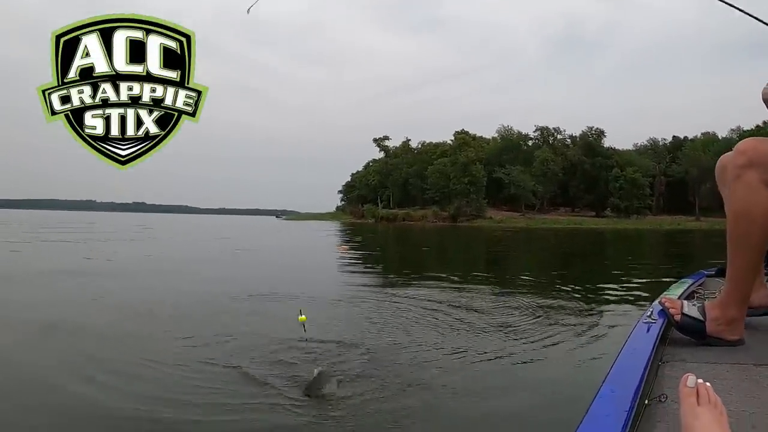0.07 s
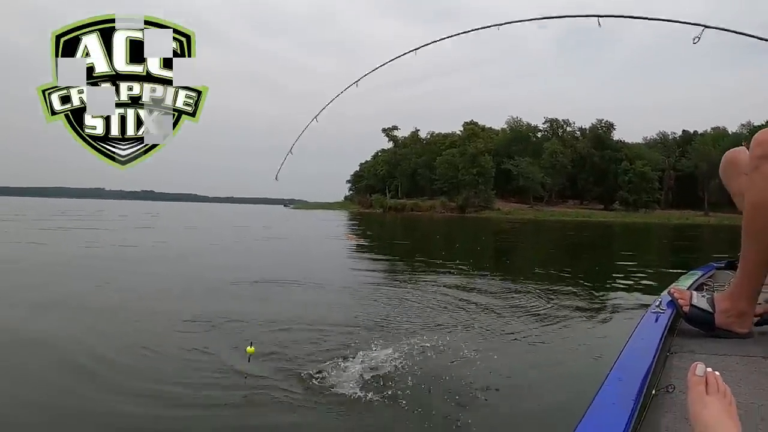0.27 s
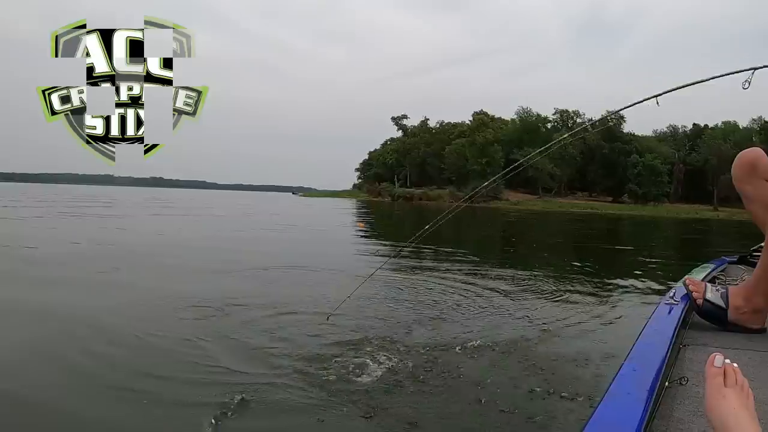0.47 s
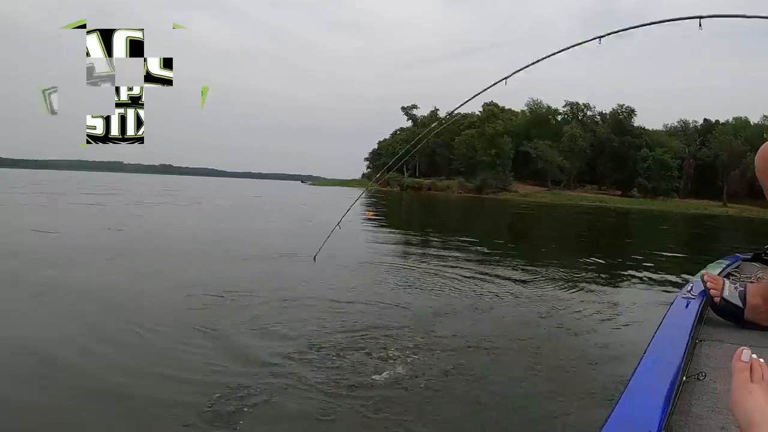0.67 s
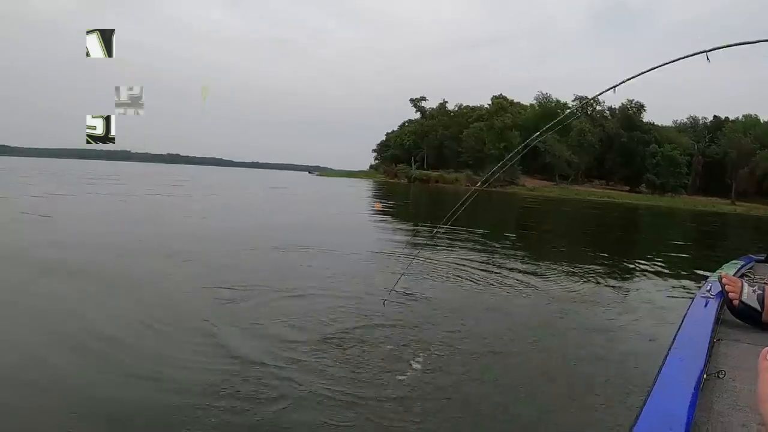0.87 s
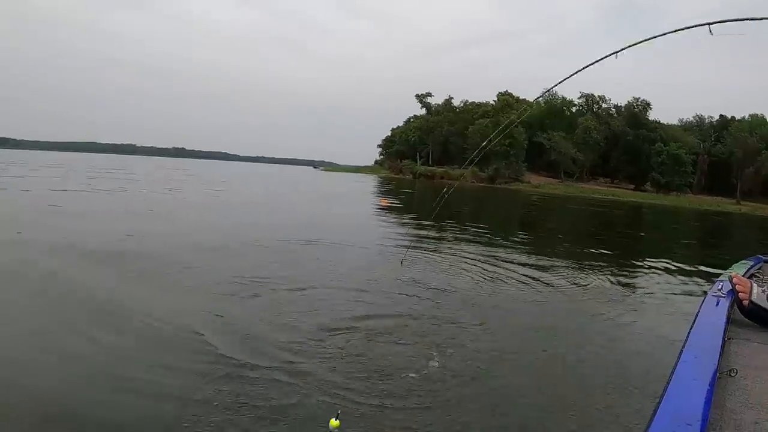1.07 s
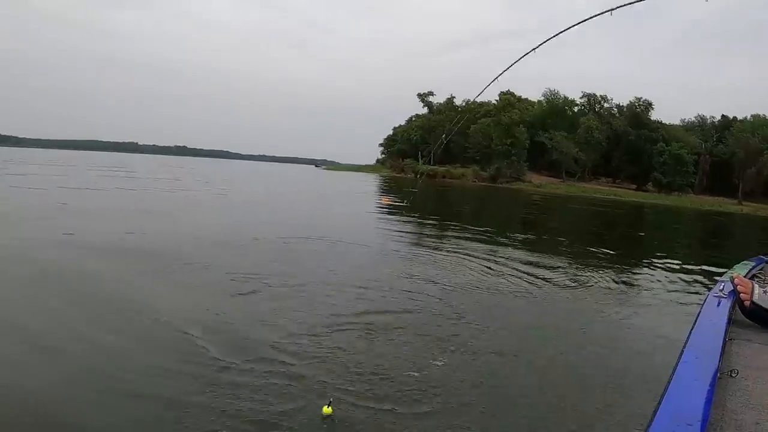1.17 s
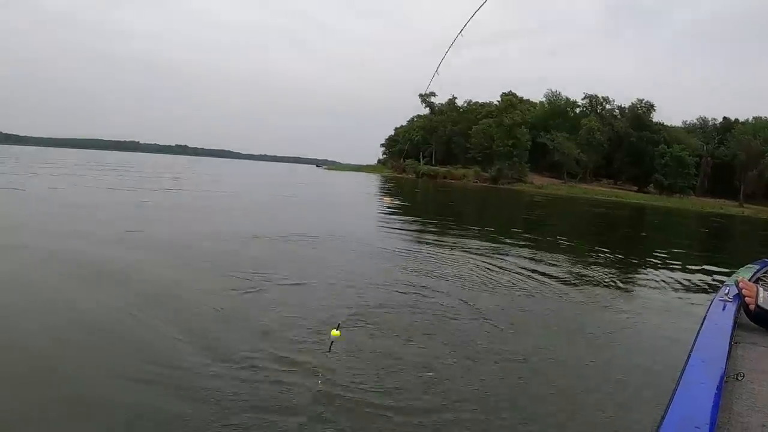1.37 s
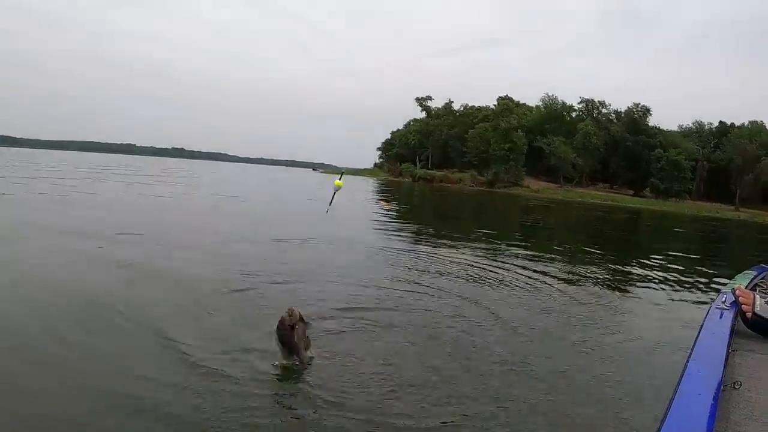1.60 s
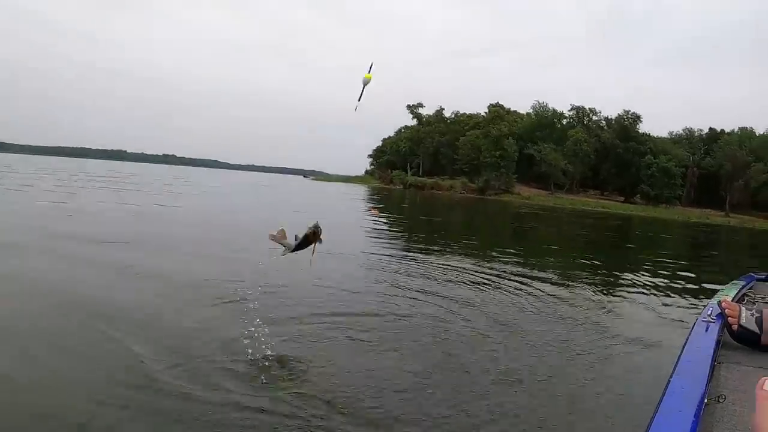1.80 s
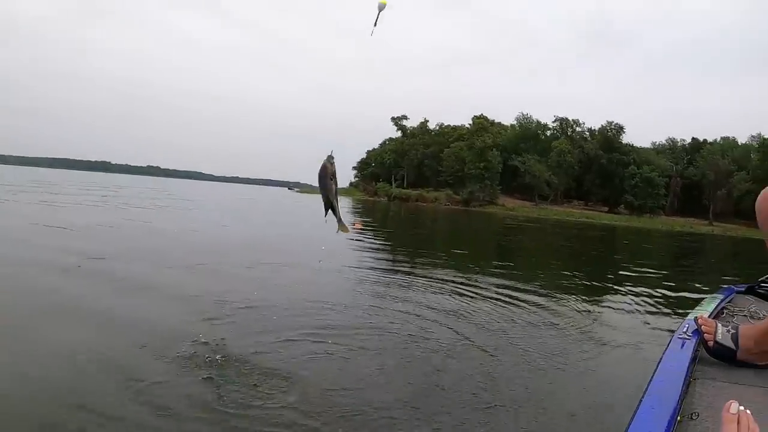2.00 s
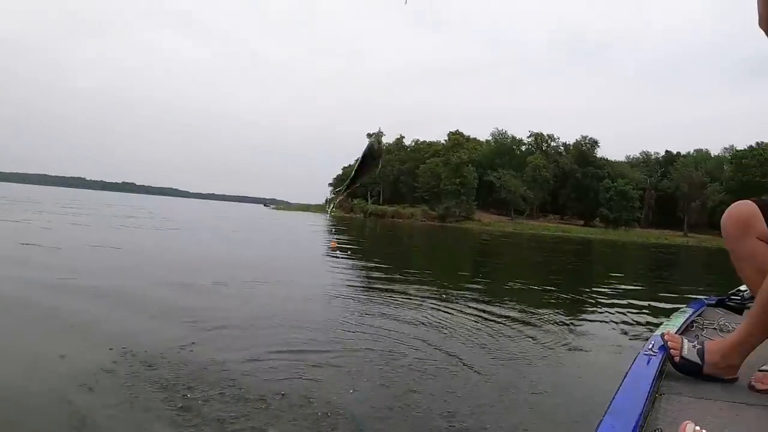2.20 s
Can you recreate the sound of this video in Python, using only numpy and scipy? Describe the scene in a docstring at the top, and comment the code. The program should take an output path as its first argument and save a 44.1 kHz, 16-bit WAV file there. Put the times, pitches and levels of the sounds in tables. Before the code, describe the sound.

After near silence, a fish slaps and churns the water in two quick bursts, gurgling and squeaking wetly; sparse bubbles and a sharp droplet click follow, then fine run-off drips, in open air, close to the microphones.

```python
"""A faint open-air hush, a thin whistle of taut line and light wind rumble come first, on a close pair of mics.
Then a hooked fish thrashes at the surface of a calm lake beside a boat and is lifted out dripping.
Slaps are shaped noise bursts, big bubbles are dying sines that mostly rise, churned water and spray are
ringing grains over hiss; wet squeaks and gulps are gliding tones, and a lone drop falls between.
The run-off is a shower of tiny rising chirps; hush, ripples and wind are filtered noise."""
import sys
import numpy as np
from scipy import signal
from scipy.fft import rfft, irfft
from scipy.io import wavfile

SR = 44100
rng = np.random.default_rng(int(sys.argv[2]) if len(sys.argv) > 2 else 0)


def volts(x):
    """Linear amplitude factor 10**(x/20) for a level x in dB, scalar or array-like."""
    e = np.asarray(x, float) / 20
    return 10 ** e


def materialize(psi):
    """Save the field psi as 16-bit PCM at rate SR to the path in sys.argv[1].

    A 1-D psi becomes a single channel; in a 2-D psi each row is a channel.
    """
    bounded = np.clip(np.atleast_2d(psi).T, -1, 1)
    quanta = np.round(bounded * 32767).astype(np.int16)
    wavfile.write(sys.argv[1], SR, quanta)


N = 99225  # samples, 2.25 s

# open-air hush, spectrum shape: [f/Hz, relative level/dB]
AIR_SPECTRUM = [(100, -6), (166, 7), (519, -6), (1340, -12.5), (1490, -33), (2220, -73), (3250, -41.5),
                (9340, -18), (15500, -58)]
AIR_DB = -75  # mid level above 300 Hz, before its slow drift
# ripples lapping the hull
LAP_HZ, LAP_WIDTH_HZ, LAP_DB = 172.9, 100, -72

# wind rumble: [t/s, level/dB]
WIND_LEVEL = [(0, -83), (.2, -63), (.3, -81), (.8, -74), (.87, -51.5), (.95, -58), (1.32, -66), (1.48, -62),
              (1.75, -69), (2.09, -69.5), (2.25, -64)]
WIND_CUT_HZ, WIND_LUMPS_DB = 52, 6
WIND_RIGHT_DB, WIND_RIGHT_OWN = -9, 1.1  # right gain; share of rumble heard on the right alone

# taut line hissing through the water, one curve each: [t/s, f/Hz, level/dB]
LINE_CURVES = [
    [(0, 3130, -69), (.15, 3110, -76.5), (.175, 2900, -62), (.222, 3030, -58)],
    [(1.725, 2925, -73), (1.76, 2640, -72), (1.81, 2590, -69)],
]
LINE_BLUR_HZ = 130

# gulps, air pockets that shrink and climb, one curve each: [t/s, f/Hz, level/dB]
GULP_CURVES = [
    [(.518, 350, -42), (.595, 410, -52), (.625, 680, -45)],
    [(.652, 290, -51), (.695, 400, -52), (.71, 540, -49)],
    [(.724, 450, -51), (.77, 535, -52), (.798, 780, -48)],
]
# wet squeaks, air forced through a closing gap: [t/s, f/Hz, level/dB]
LONG_SQUEAK = [(.774, 1993, -54), (.79, 3200, -45), (.8, 3840, -34), (.818, 5470, -53), (.835, 5480, -55.5),
               (.846, 5900, -61)]
SHORT_SQUEAK_CURVE = [(0.767, 3340, -47), (.773, 3560, -43), (0.784, 5420, -56), (0.788, 6170, -55)]
OVERTONE_DB = -23.5  # octave, against the tone

# run-off from the lifted fish
DRIPS_FROM_S, DRIPS_TO_S, DRIP_COUNT = 1.72, 2.24, 230
DRIP_LOW_HZ, DRIP_HIGH_HZ = 1500, 8000  # range of starting pitches
DRIP_DB, DRIP_CYCLES = 5, 40  # base level over the spray; starting-pitch cycles to fall 60 dB

# churned water: [t/s, small-bubble level/dB, spray level/dB]
CHURN_LEVELS = [(0, -68.5, -70), (.23, -63.5, -66.5), (.25, -37.5, -42.5), (.265, -42, -32.5),
                (.285, -44.5, -37.5), (.3, -23, -44), (.325, -25.5, -33.5), (.345, -33.5, -45.5),
                (.4, -37, -52.5), (.45, -41, -45.5), (.51, -38, -39), (.65, -46.5, -49),
                (.675, -58.5, -62.5), (.73, -52.5, -59), (.83, -63.5, -55.5), (.88, -69, -66),
                (1.01, -62, -66), (1.18, -69, -68.5), (1.4, -73, -71.5), (1.71, -79.5, -84),
                (1.75, -71.5, -78), (1.92, -66, -61.5), (2.08, -80.5, -72), (2.25, -73.5, -76.5)]
# small bubbles, spectrum shape: [f/Hz, relative level/dB]
FOAM_SPECTRUM = [(150, -46), (250, -11.5), (411, -15), (524, -3.5), (738, -4), (1030, 0.5), (2000, -2.5),
                 (3600, -32.5)]
# airborne droplets, spectrum shape: [f/Hz, relative level/dB]
SPRAY_SPECTRUM = [(1060, -48.5), (1800, -14), (3300, -13.5), (4720, -21.5), (9790, -27.5), (11300, -41.5),
                  (12400, -47), (15500, -63)]
FOAM_PER_S, SPRAY_PER_S = 3500, 3500  # grains per second before clumping
FOAM_CYCLES, SPRAY_CYCLES = 4.0, 3.5  # ring: pitch over bandwidth of each resonance
GRAIN_SPREAD_DB, CLUMP_DB = 2.5, 3.0
FOAM_WIDE_DB, SPRAY_WIDE_DB = -12, 0  # stereo width; each side takes half

# large bubbles: [t/s, starting f/Hz, starting level/dB, t60/s, initial rise/(octaves/s)]
BIG_BUBBLES = [(.255, 183, -25, 0.023, 14), (.274, 2146, -18.5, 0.023, 48), (.294, 763, -9, 0.036, 1.5),
               (.314, 1290, -13.5, 0.058, 7.5), (.305, 781, -24, 0.186, 3.5), (.339, 533, -17.5, 0.055, -1),
               (.358, 606, -25.5, 0.1, 9), (.36, 1338, -19.5, 0.062, 16.5), (.359, 1625, -25.5, 0.066, 5),
               (.41, 641, -21.5, 0.077, 6.5), (.425, 297.6, -36, 0.67, 26), (.628, 743, -24, 0.039, 7),
               (.628, 1670, -17.5, 0.014, 12), (.768, 1490, -45.5, 0.049, 8), (.8, 1024, -53, 0.24, 7),
               (.823, 1364, -37.5, 0.034, -18), (.83, 122, -35.5, 0.054, 1), (.9, 558, -47, 0.17, 12.5),
               (.93, 511, -47.5, 0.1, -0.5), (.93, 1210, -44.5, 0.051, 21), (1.001, 561, -45.5, 0.16, 7.5),
               (1.006, 727, -41, 0.086, 18), (1.14, 659, -59.5, 0.55, 5), (1.148, 1065, -49.5, 0.094, 18.5),
               (1.206, 1357, -43.5, 0.04, -3), (1.3632, 1332, -32.5, 0.033, 10.5),
               (1.3632, 8720, -28, 0.026, 12), (1.376, 1757, -38, .025, 35), (1.813, 1885, -51.5, 0.06, 7),
               (1.877, 1440, -45.5, 0.048, 0), (1.903, 2330, -41, 0.042, 14), (1.912, 1453, -39, 0.04, 0),
               (1.941, 3340, -43, 0.042, -6.5), (1.961, 1905, -47.5, 0.075, 5.5),
               (2.156, 2680, -39, 0.015, -16)]
BUBBLE_RISE_CYCLES, BUBBLE_LIFE_CYCLES = 0.64, 32
BUBBLE_WOBBLE_DB, BUBBLE_JITTER, WOBBLE_HZ = 3.5, .03, 130  # jitter is a share of the pitch

# slaps and droplet ticks: [t/s, peak level/dB, centre f/Hz, t60/s]
SLAP_HITS = [(0.237, -10.5, 3690, 0.0096), (0.2359, -22, 1300, 0.0078), (0.276, -25.5, 3060, 0.026),
             (0.292, -18.5, 1400, 0.058), (0.294, -16, 2870, 0.0087), (0.629, -27.5, 1280, 0.018),
             (.39, -35, 4120, 0.04), (0.559, -28.5, 3650, 0.02), (0.654, -33.5, 4720, 0.0091),
             (0.858, -37, 5200, 0.0068), (1.205, -36.5, 3700, 0.0095), (1.363, -18.5, 2610, 0.0046),
             (1.3638, -40, 7300, 0.027), (1.375, -38.5, 3400, 0.011), (1.72, -47.5, 6890, 0.0065),
             (1.787, -43, 7780, 0.0076), (1.879, -44, 6400, 0.011), (1.939, -42, 5230, 0.018),
             (1.993, -34, 5870, 0.013), (2.038, -42.5, 4280, 0.021), (2.0564, -39, 4710, 0.0026),
             (2.066, -45.5, 4160, 0.023), (1.168, -44.5, 3285, .025), (2.23, -52.5, 6500, 0.0089)]
SLAP_WIDTH_OF_CENTRE, SLAP_BROAD_DB, SLAP_RISE_S = 0.6, -20, .0004
SLAP_TOP = 4.5  # the crisp layer reaches up to this multiple of the centre
SNAP_DB, SNAP_T60_S = 22, .006  # longer hits get a softer opening snap

# water in the stereo pair: [f/Hz, left minus right level/dB]
LEFT_OVER_RIGHT = [(60, 7), (550, -1.5), (1650, 1.5), (4970, 2), (15000, -9)]
# phase lead of the left side, negative for a lag: [f/Hz, phase/rad]
LEFT_PHASE = [(60, 0), (4570, -0.9), (8530, -1.8), (15300, 0.11)]
WATER_LOW_HZ = 130
TOP_HZ = 15950


def in_time(rows):
    """Columns of a table, joined by straight lines in time."""
    s, *cols = np.transpose(rows)
    return [np.interp(np.arange(N) / SR, s, c) for c in cols]


def at_hz(points, hz):
    """Read a spectrum curve on a log-frequency axis."""
    p = np.array(points)
    return np.interp(np.log(hz), np.log(p[:, 0]), p[:, 1])


def rms_one(x):
    """Scale to rms 1."""
    return x / np.sqrt(np.mean(x ** 2) + 1e-20)


def drift(rate_hz):
    """Smooth random wander of rms 1: noise through two one-pole low-passes."""
    r = np.exp(-2 * np.pi * rate_hz / SR)
    noise = rng.standard_normal(N + SR)
    return rms_one(signal.lfilter([1], [1, -2 * r, r * r], noise)[SR:])


def fft_hz():
    """Bin frequencies, kept above zero for the log axis."""
    return np.maximum(np.fft.rfftfreq(N, 1 / SR), 1)


def coloured(spectrum):
    """Noise of a given spectrum, rms 1."""
    white = rfft(rng.standard_normal(N))
    return rms_one(irfft(white * volts(at_hz(spectrum, fft_hz())), N))


def resonance(x, hz, width_hz):
    """Two-pole resonance, gain about 1 at its top."""
    r = np.exp(-np.pi * width_hz / SR)
    gain = (1 - r * r) / 2
    return signal.lfilter([gain, 0, -gain], [1, -2 * r * np.cos(2 * np.pi * hz / SR), r * r], x)


def fade_ends(rows, fade_s):
    """Straight fades at both ends of a curve, silence outside it."""
    t = np.arange(N) / SR
    return np.clip(np.minimum(t - rows[0][0], rows[-1][0] - t) / fade_s, 0, 1)


def backdrop():
    """Open-air hush as wide coloured noise, and ripples at the hull as low resonant noise."""
    mid, side = coloured(AIR_SPECTRUM), coloured(AIR_SPECTRUM)
    high_pass = signal.butter(4, 300, "high", fs=SR, output="sos")
    rms_above = np.mean(signal.sosfilt(high_pass, mid) ** 2) ** .5
    wide = mid + volts(1.0) * side * [[1], [-1]]
    hush = volts(AIR_DB + 2.5 * drift(3.8)) / rms_above * wide
    lap = rng.standard_normal(N)
    for _ in range(2):
        lap = resonance(lap, LAP_HZ, LAP_WIDTH_HZ)
    return hush + volts(LAP_DB + 3.5 * drift(3.3)) * rms_one(lap)


def wind():
    """Lumpy low-band noise, stronger on the left; the right adds rumble of its own."""
    band = signal.butter(2, [18, WIND_CUT_HZ], "band", fs=SR, output="sos")
    shared, own = signal.sosfilt(band, rng.standard_normal((2, N + SR)))[:, SR:]
    lumps = volts(WIND_LUMPS_DB * drift(7.1))
    left = shared * lumps
    right = volts(WIND_RIGHT_DB) * (shared + WIND_RIGHT_OWN * own) * lumps
    return volts(in_time(WIND_LEVEL)[0]) * np.array([left, right]) / np.std((left + right) / 2)


def line_hiss(rows):
    """Taut line in water: a blurred whistle, narrow noise around a slowly moving pitch."""
    hz, db = in_time(rows)
    phase = 2 * np.pi * np.cumsum(hz) / SR
    blurred = drift(LINE_BLUR_HZ) * np.sin(phase) + drift(LINE_BLUR_HZ) * np.cos(phase)
    return fade_ends(rows, .006) * volts(db) * blurred


def gliding_tone(rows):
    """A wavering tone on a pitch curve, with a faint octave."""
    hz, db = in_time(rows)
    phase = 2 * np.pi * np.cumsum(hz) / SR
    wobble = volts(2 * drift(200))
    tone = np.sin(phase) + volts(OVERTONE_DB) * np.sin(2 * phase)
    return fade_ends(rows, .003) * wobble * volts(db) * tone


def gulps():
    """Air pockets shrink, so their tones climb."""
    return sum(gliding_tone(rows) for rows in GULP_CURVES)


def squeaks():
    """Air forced through a closing wet gap: two overlapping glides."""
    return gliding_tone(LONG_SQUEAK) + gliding_tone(SHORT_SQUEAK_CURVE)


def drips():
    """Water runs off the lifted fish: many tiny chirps that rise and die."""
    out, t = np.zeros(N + 1000), np.arange(1000) / SR
    spray_db = in_time(CHURN_LEVELS)[1]
    for when, size, loud, bend in rng.random((DRIP_COUNT, 4)):
        i = int((DRIPS_FROM_S + (DRIPS_TO_S - DRIPS_FROM_S) * when) * SR)
        hz = DRIP_LOW_HZ * (DRIP_HIGH_HZ / DRIP_LOW_HZ) ** size
        phase = 2 * np.pi * hz * t * (1 + 25 * bend * t)
        start_db = spray_db[i] + DRIP_DB - 3.35 * np.log(loud + 0.026)  # a few drips stand out
        out[i:i + 1000] += volts(start_db - 60 * t * hz / DRIP_CYCLES) * np.sin(phase)
    return out[:N]


def grains(spectrum, per_s, cycles, noise_share, wide_db):
    """Clumped random clicks ring a few cycles, each a little to one side, over a smooth hiss."""
    sizes = volts(GRAIN_SPREAD_DB * np.minimum(rng.exponential(1, N), 5)) * rng.choice([-1, 1], N)
    born = rng.random(N) < per_s * volts(CLUMP_DB * drift(25)) / SR
    pitches = np.geomspace(spectrum[0][0], spectrum[-1][0], 24)
    dealt = rng.integers(0, 24, N)  # which pitch each click rings
    ringing = np.zeros((2, N))
    for k, hz in enumerate(pitches):
        clicks = sizes * born * (dealt == k)
        side = volts(wide_db) * rng.choice([-1, 1], N) * [[1], [-1]] / 2
        ring = clicks * (1 + side) + 1e-18
        for _ in range(2):
            ring = resonance(ring, hz, hz / cycles)
        ringing += volts(at_hz(spectrum, hz)) * ring
    hiss = coloured(spectrum) + volts(wide_db) / 2 * coloured(spectrum) * [[1], [-1]]
    return np.sqrt(1 - noise_share) * rms_one(ringing) + np.sqrt(noise_share) * hiss


def churn():
    """Small bubbles ring low and spray rings high, both following the thrashing."""
    foam_db, spray_db = in_time(CHURN_LEVELS)
    foam = grains(FOAM_SPECTRUM, FOAM_PER_S, FOAM_CYCLES, 0.085, FOAM_WIDE_DB)
    spray = grains(SPRAY_SPECTRUM, SPRAY_PER_S, SPRAY_CYCLES, 0.34, SPRAY_WIDE_DB)
    return volts(foam_db) * foam + volts(spray_db + CLUMP_DB * drift(51)) * spray


def bubbles():
    """Dying sines, most climbing as the bubble nears the surface; each bursts soon after."""
    out, t = np.zeros(N + 4000), np.arange(4000) / SR
    wobble, jitter = drift(WOBBLE_HZ), drift(WOBBLE_HZ)
    for k, (s, hz, db, t60, rise) in enumerate(BIG_BUBBLES):
        own = slice(1500 * k, 1500 * k + 4000)  # this bubble's stretch of the wander
        octaves = np.minimum(rise * t * (1 + 5.1 * t), 1.2)
        pitch = hz * (1 + BUBBLE_JITTER * jitter[own]) * 2 ** octaves
        onset = 1 - np.exp(-t * hz / BUBBLE_RISE_CYCLES)
        life_s = min(.045, BUBBLE_LIFE_CYCLES / hz)
        burst = np.clip((life_s - t) / 0.0038, 0, 1)
        shape = volts(db - 60 * t / t60 + BUBBLE_WOBBLE_DB * wobble[own]) * onset * burst
        i = int(s * SR)
        out[i:i + 4000] += shape * np.sin(2 * np.pi * np.cumsum(pitch) / SR)
    return out[:N]


def slaps():
    """Short noise bursts, coloured by the size of what hits the water."""
    out, t = np.zeros(N + 4000), np.arange(4000) / SR
    for s, db, hz, t60 in SLAP_HITS:
        burst = rng.standard_normal(4000) * volts(-60 * t / t60) * (1 - np.exp(-t / SLAP_RISE_S))
        # one opening sample gives short hits a clean snap
        burst[0] = volts(SNAP_DB - 20 * np.log10(1 + (t60 / SNAP_T60_S) ** 2))
        crisp_band = [500, min(SLAP_TOP * hz, TOP_HZ)]
        crisp = signal.sosfilt(signal.butter(3, crisp_band, "band", fs=SR, output="sos"), burst)
        width_hz = hz * SLAP_WIDTH_OF_CENTRE
        body = resonance(resonance(burst, hz, width_hz), hz, width_hz)
        hit = body + volts(SLAP_BROAD_DB) * resonance(crisp, 3000, 5000)
        i = int(s * SR)
        out[i:i + 4000] += volts(db) * hit / np.abs(hit).max()
    return out[:N]


def place_water(water):
    """Tilt level and phase between left and right by frequency."""
    hz = fft_hz()
    half_tilt_db = at_hz(LEFT_OVER_RIGHT, hz) / 2
    left = volts(half_tilt_db) * np.exp(1j * at_hz(LEFT_PHASE, hz))
    right = volts(-half_tilt_db)
    return irfft(rfft(water) * np.array([left, right]), N)


def scene():
    """All sources at the microphone pair."""
    water = sum(map(line_hiss, LINE_CURVES)) + gulps() + squeaks() + drips()
    water = water + churn() + bubbles() + slaps()
    low_cut = signal.butter(2, WATER_LOW_HZ, "high", fs=SR, output="sos")
    return backdrop() + wind() + place_water(signal.sosfilt(low_cut, water))


def band_limit(x):
    """A steep low-pass at the top of the band."""
    return signal.sosfilt(signal.butter(12, 15760, fs=SR, output="sos"), x)


def record(dry):
    """Finish the mix with a steep low-pass, 60 dB down from TOP_HZ upward."""
    top_cut = signal.cheby2(10, 60, TOP_HZ, fs=SR, output="sos")
    finished = signal.sosfilt(top_cut, dry)
    return band_limit(finished)


dry = scene()
out = record(dry)
materialize(out)
```